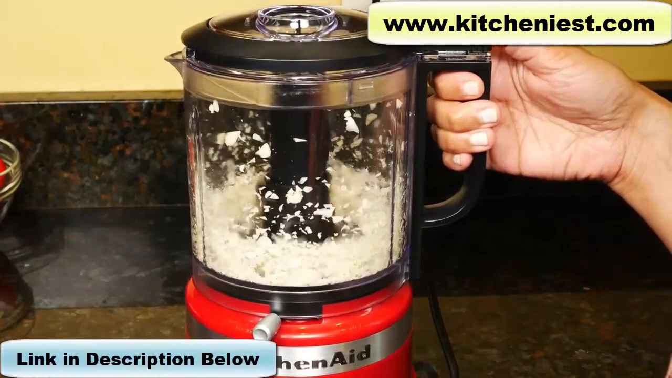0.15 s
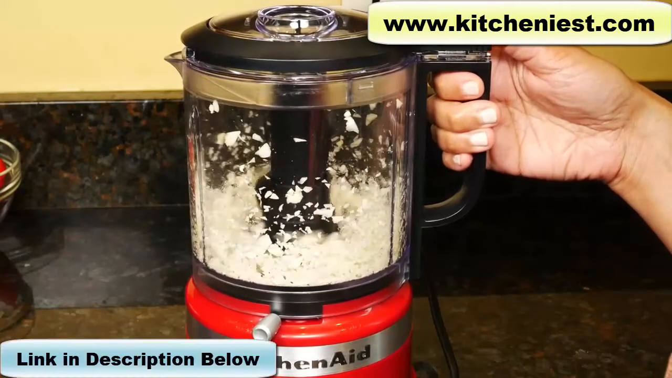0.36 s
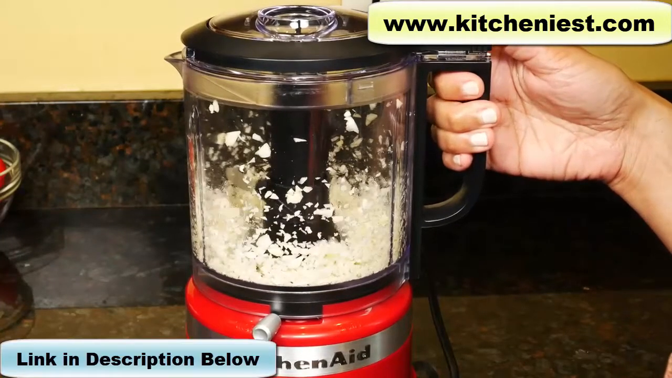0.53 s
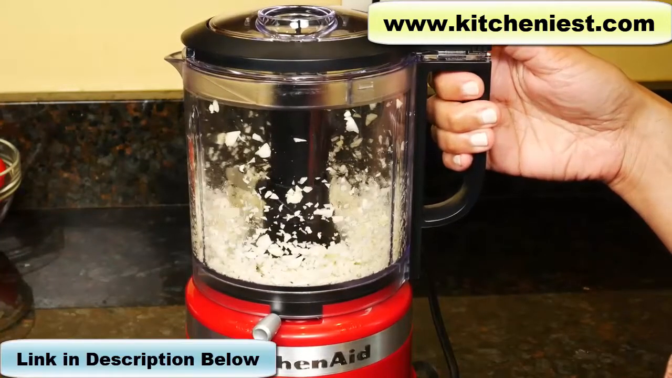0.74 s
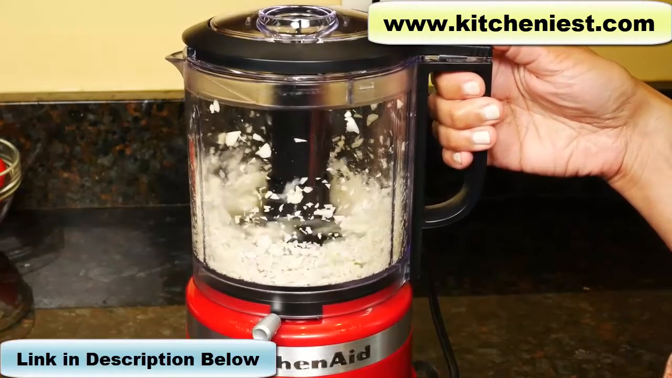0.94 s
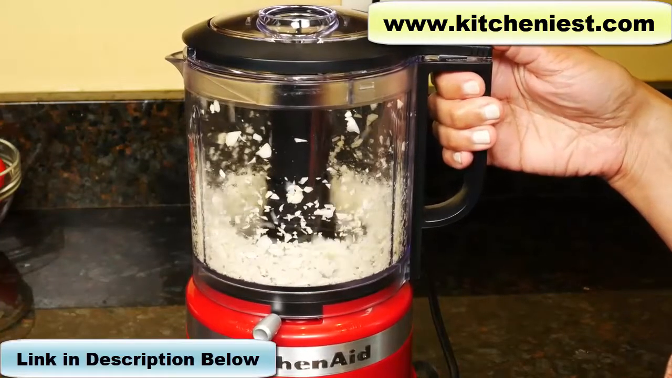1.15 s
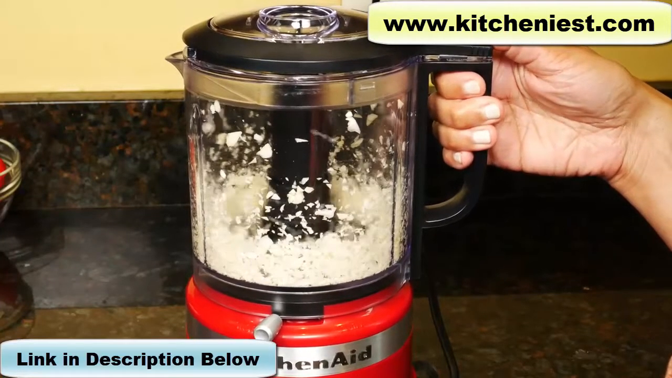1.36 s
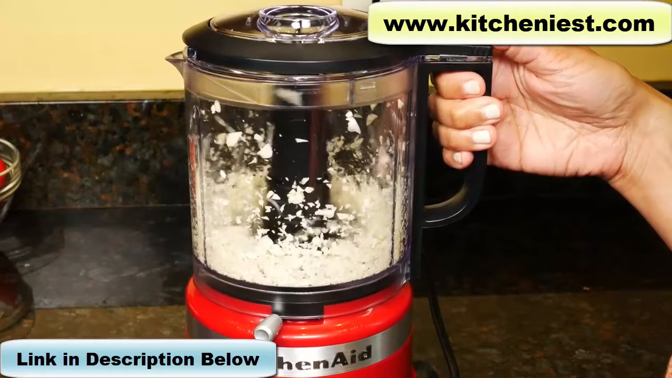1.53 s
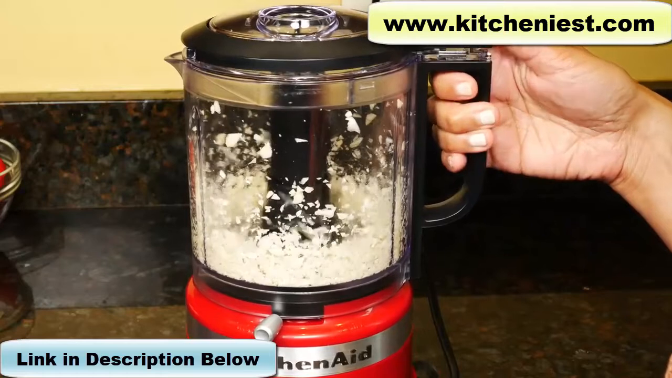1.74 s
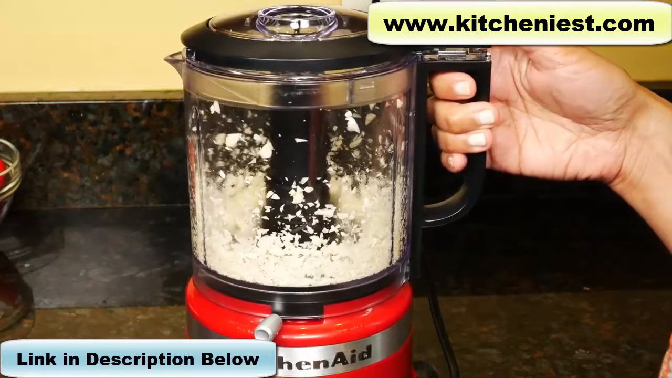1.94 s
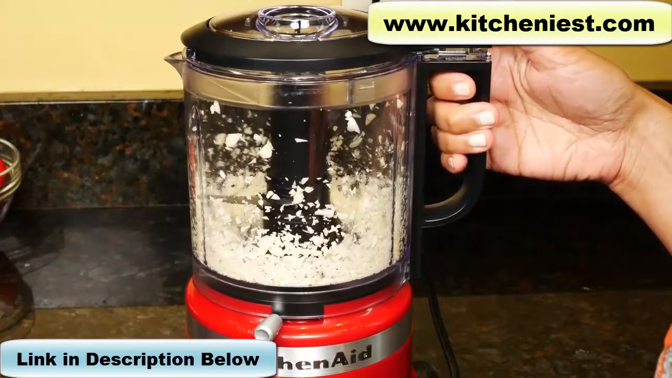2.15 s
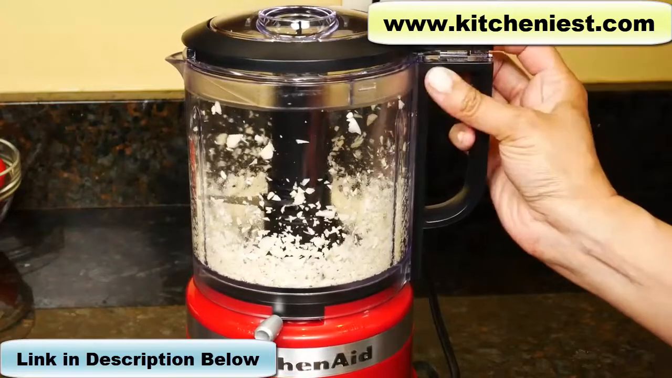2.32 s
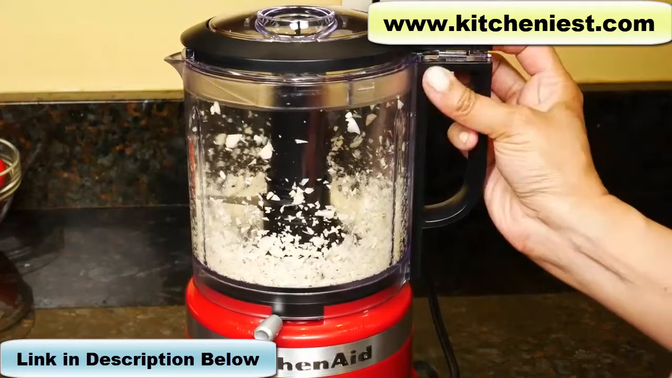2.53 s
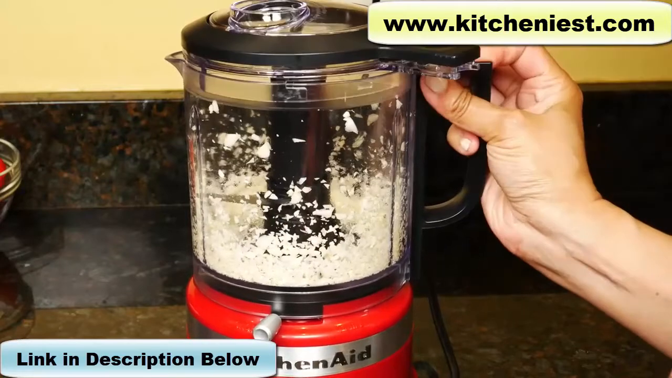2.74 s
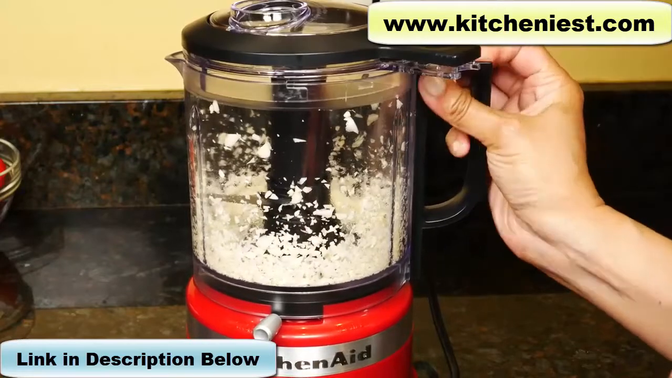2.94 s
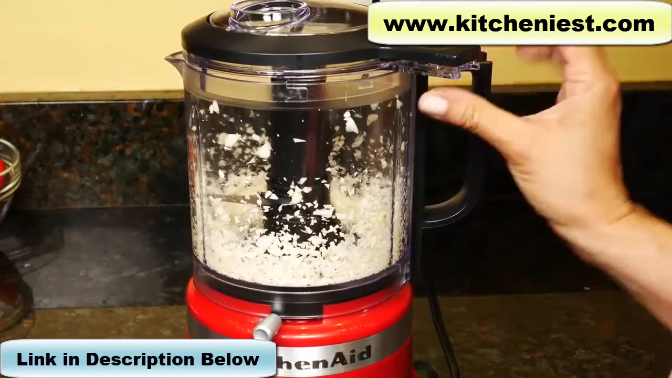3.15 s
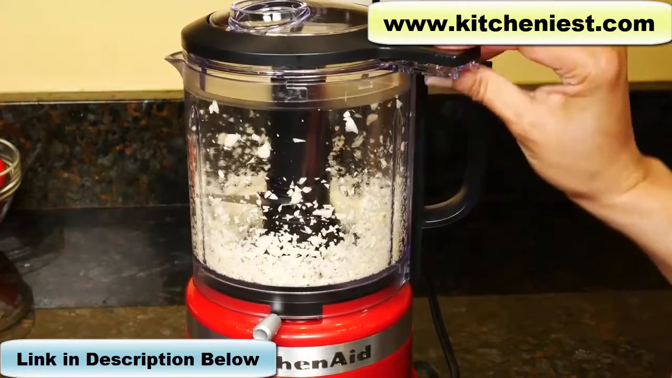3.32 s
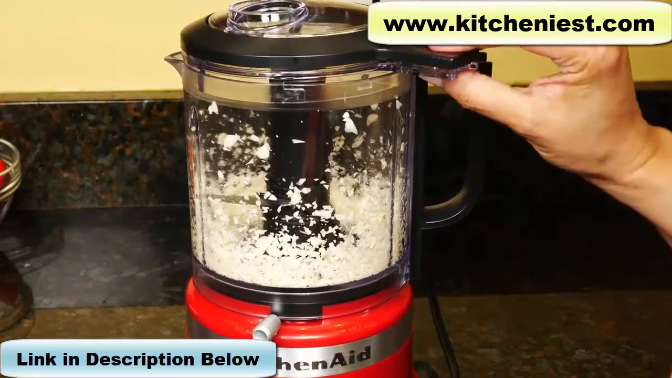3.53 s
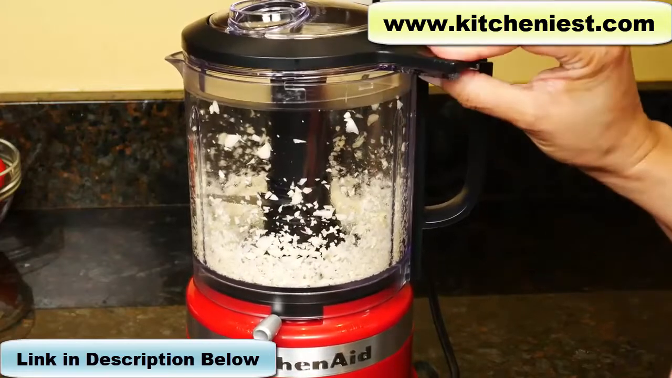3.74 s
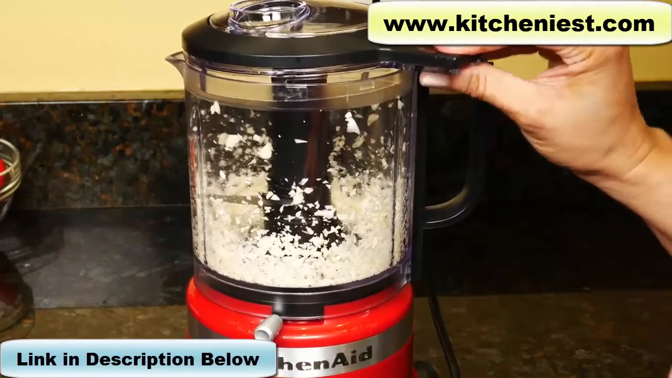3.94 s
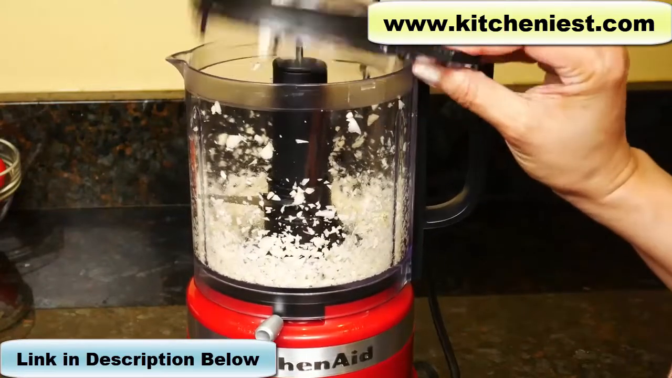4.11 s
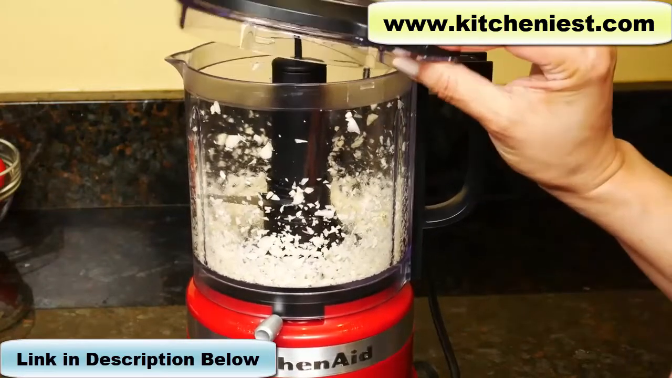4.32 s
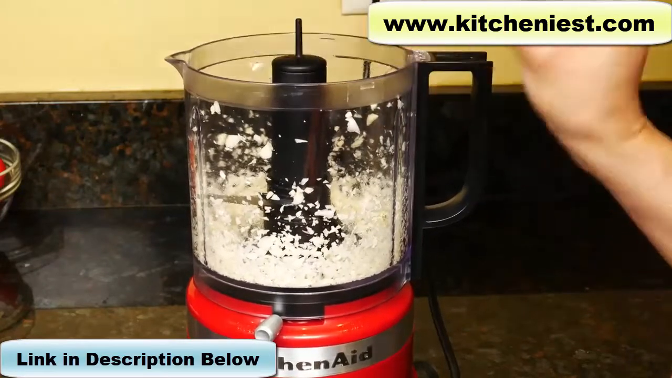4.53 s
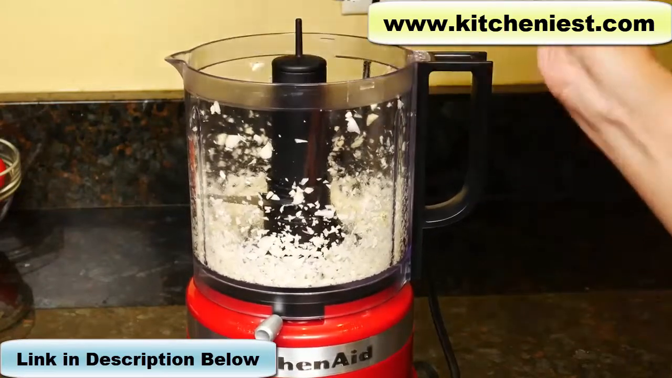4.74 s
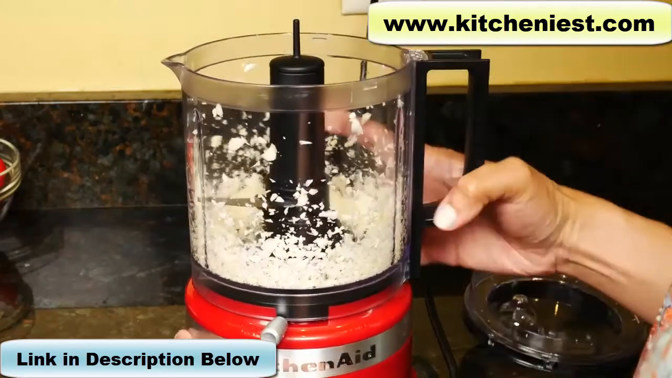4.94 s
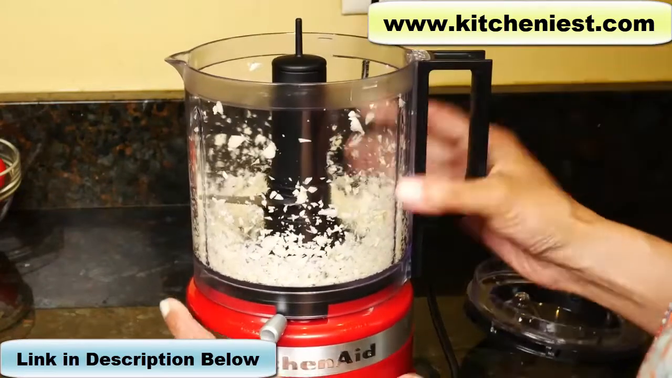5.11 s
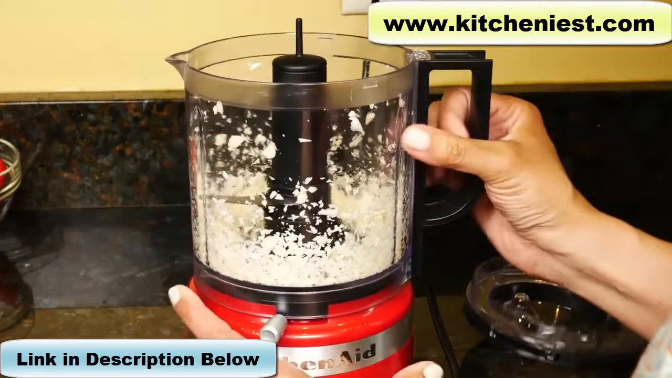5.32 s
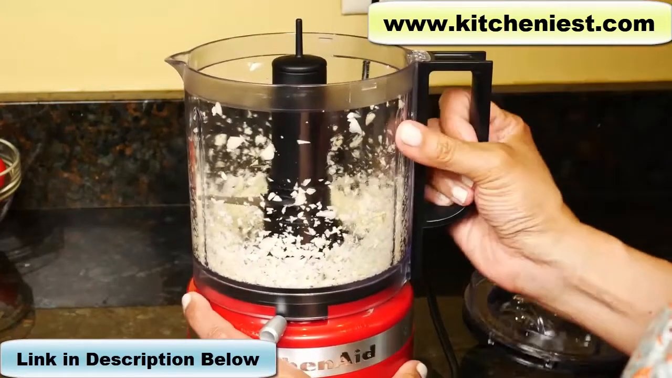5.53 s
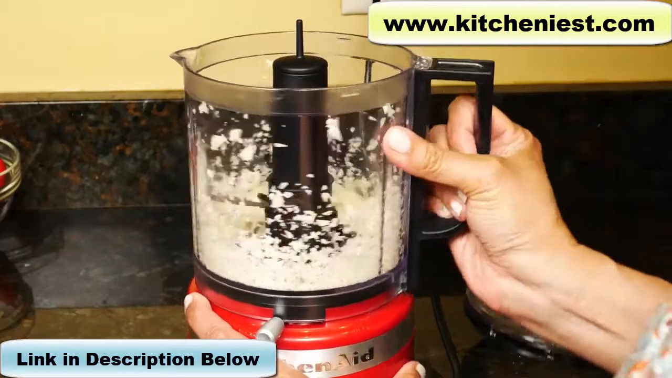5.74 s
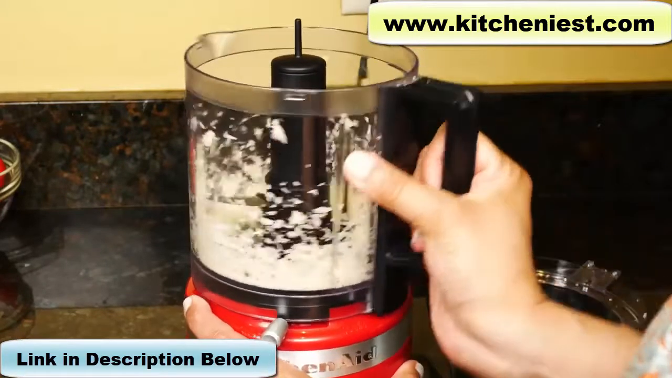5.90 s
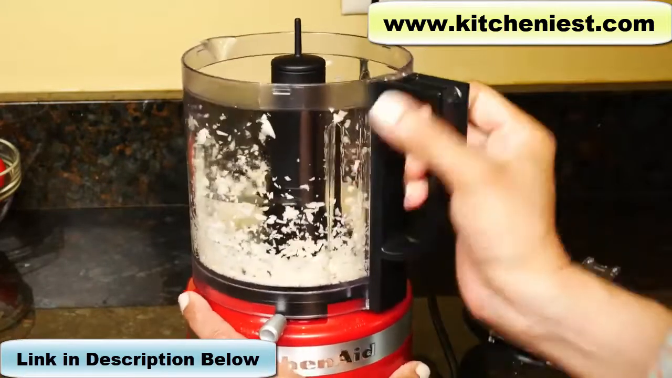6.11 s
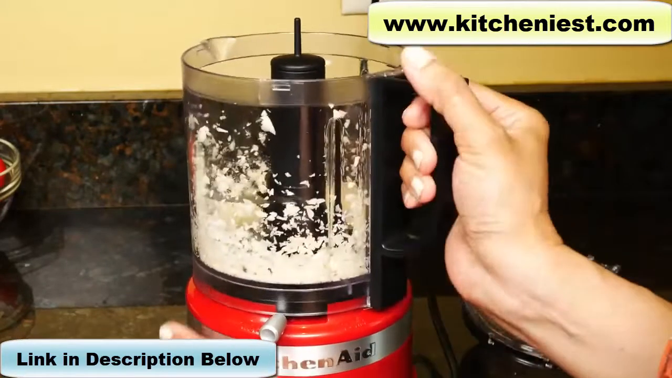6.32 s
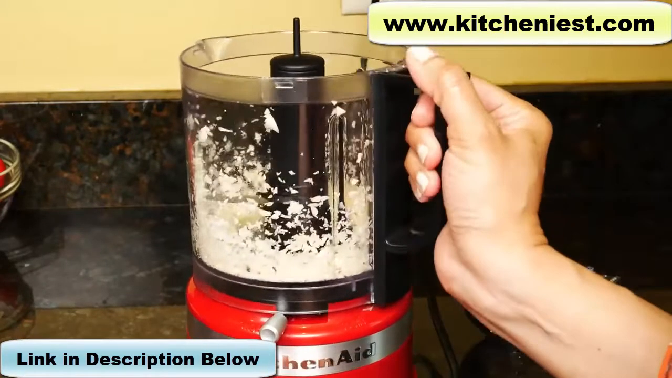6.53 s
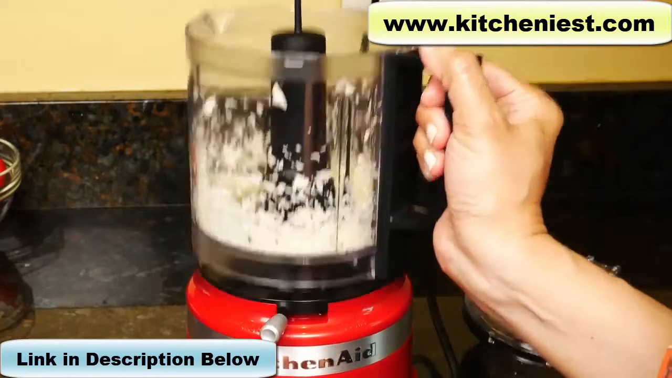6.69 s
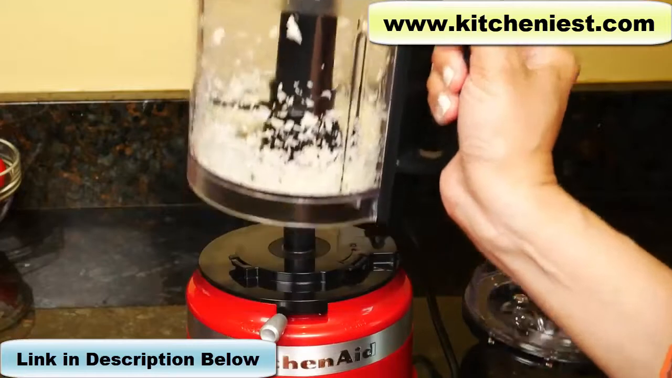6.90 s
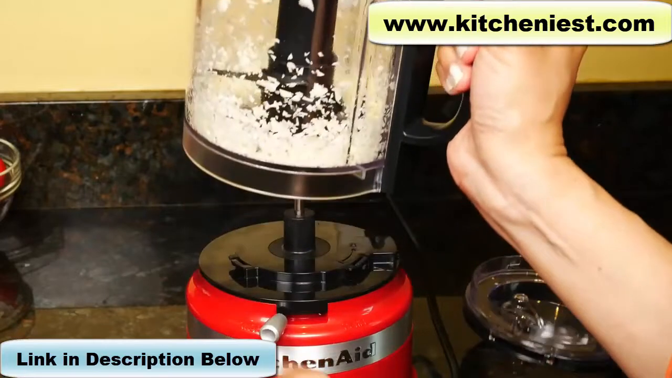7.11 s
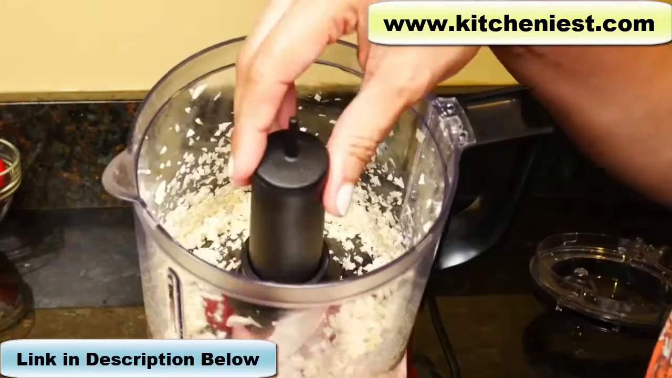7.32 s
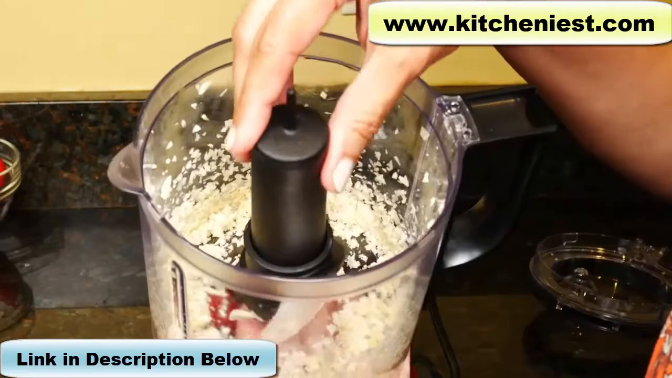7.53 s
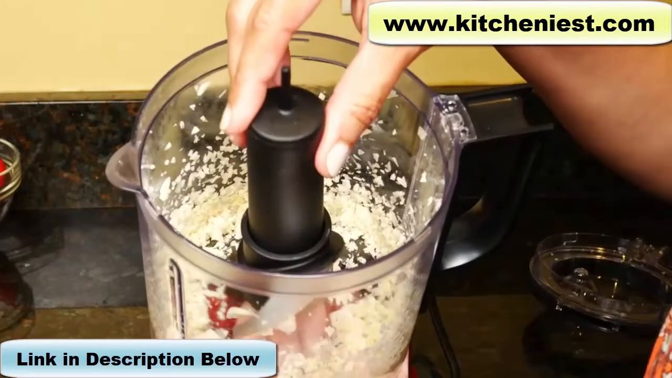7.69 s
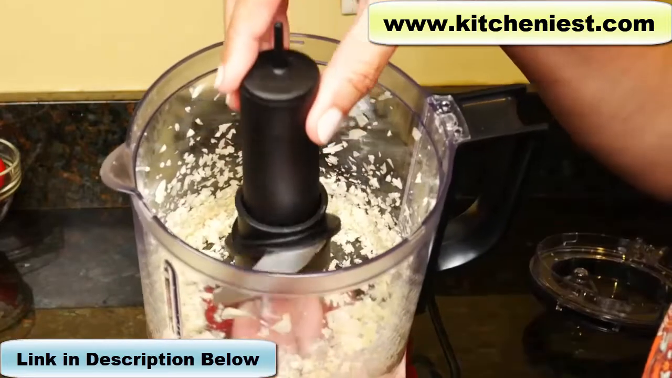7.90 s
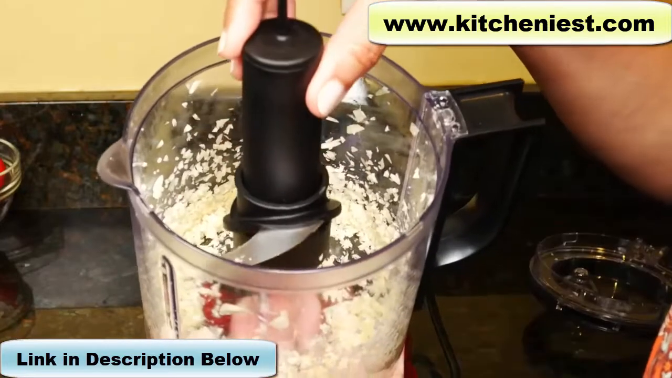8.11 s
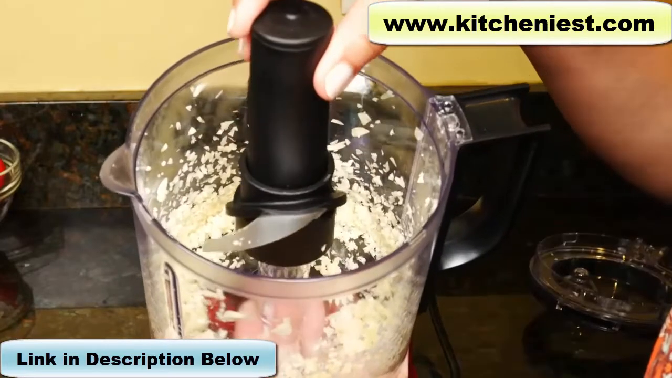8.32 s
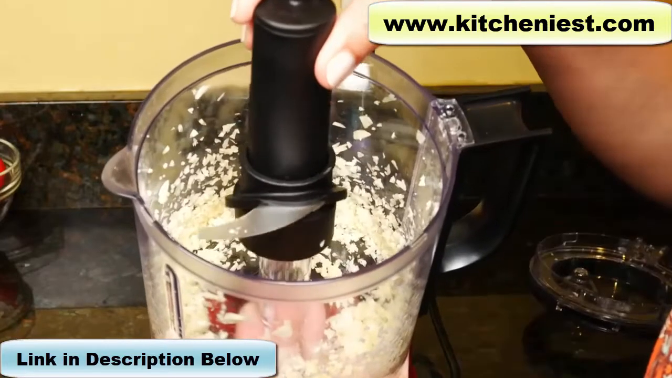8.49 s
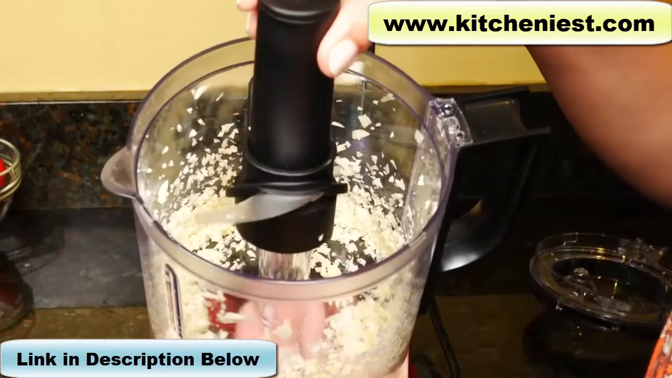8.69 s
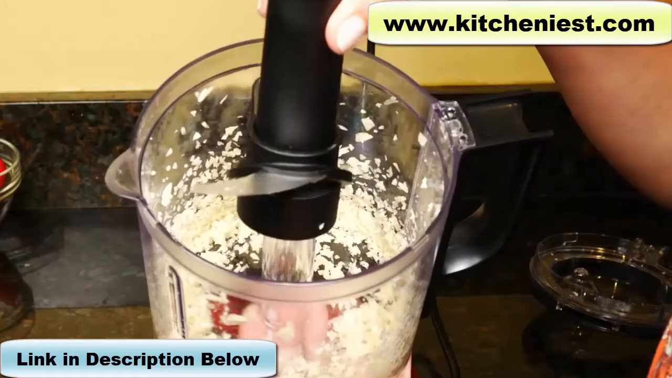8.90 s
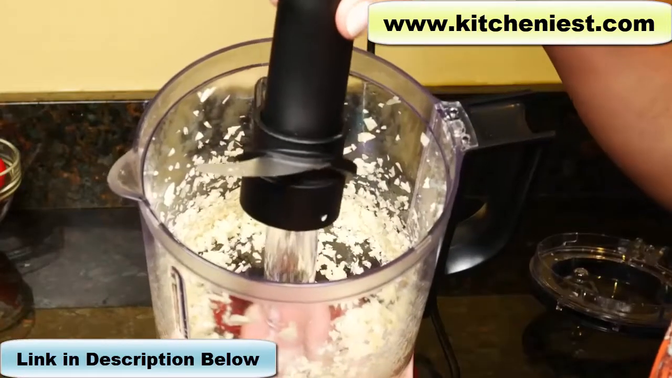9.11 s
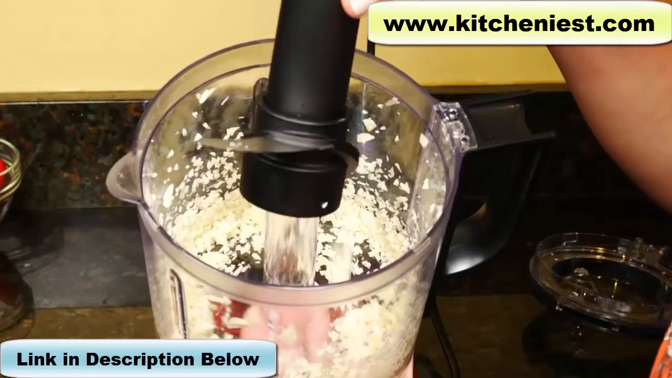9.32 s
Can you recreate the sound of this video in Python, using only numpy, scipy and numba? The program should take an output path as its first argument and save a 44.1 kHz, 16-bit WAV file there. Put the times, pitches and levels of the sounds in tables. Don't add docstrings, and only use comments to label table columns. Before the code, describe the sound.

A small electric chopper at arm's length in a hard tiled kitchen, nearly mono, with a short bright echo and faint fridge hum. It starts already running down, its toothy whine falling and rattling out before 0.8 s. A button click at 0.87 s starts one more pulse, gritty with tumbling food, rising quickly; released at 1.6 s, it glides down to a stop around 2.3 s. A plastic snap comes at 2.6 s, then faint touches, small clicks near 3.8 s and a sharp lid pop at 4.1 s. At 4.9 s the lid lands and the background hum steps up. The bowl twists at 5.2 s, knocks hard at 5.8 and 6.05 s, and rattles off its coupling from 6.6 to 6.9 s. From 7.25 s a hollow hub slides up in stuttering low hoots, pops and thin squeaks, strongest around 7.8 s, fading into sparse hoots by 9.3 s.

```python
import sys
import numpy as np
from scipy import signal
from scipy.fft import rfft, irfft
from scipy.io import wavfile
from scipy.ndimage import uniform_filter1d
from numba import njit

SR = 44100
rng = np.random.default_rng(int(sys.argv[2]) if len(sys.argv) > 2 else 0)


def generate_wav(sig):
    pcm = np.round(np.clip(np.atleast_2d(sig).T, -1, 1) * 32767).astype(np.int16)
    wavfile.write(sys.argv[1], SR, pcm)


def volts(x):
    e = np.asarray(x, float) / 20
    return 10 ** e


N = 412330
T = np.arange(N) / SR
TOP_SPEED_HZ, STEADY_HZ = 2654, 2200
TUMBLE_DB, TUMBLE_HZ = 2.5, 40


def unit(x):
    return x / np.sqrt(np.mean(np.abs(x) ** 2))


def noise():
    return rng.standard_normal(N)


def columns(spans):
    rows = np.concatenate([np.array(s, float) for s in spans])
    on = sum((T >= s[0][0]) & (T <= s[-1][0]) for s in spans)
    return uniform_filter1d(1. * on, size=128), [np.interp(T, rows[:, 0], c) for c in rows.T[1:]]


def shape_by(x, table):
    hz, db = np.transpose(table)
    f = np.arange(N // 2 + 1) * SR / N + 1
    return irfft(rfft(x) * volts(np.interp(np.log(f), np.log(hz), db)), N)


def colour(x, table):
    return unit(shape_by(x, table))


def band(x, lo_hz, hi_hz):
    return signal.sosfilt(signal.butter(2, [lo_hz, hi_hz], "bandpass", fs=SR, output="sos"), x)


def walk(hz):
    k = max(int(SR / hz), 1)
    return unit(uniform_filter1d(uniform_filter1d(noise(), k), k))


def grit(db):
    size = rng.exponential(size=N // 16 + 1).clip(0, 4)
    return noise() * volts(db * size.repeat(16)[:N])


@njit
def svf(x, hz, width):
    y, b, l = np.empty(len(x)), 0., 0.
    for i in range(len(x)):
        g, k = np.tan(np.pi * hz[i] / SR), width[i] / hz[i]
        v = (b + g * (x[i] - l)) / (1 + g * (g + k))
        b, l, y[i] = 2 * v - b, l + 2 * g * v, k * v
    return y


def peak(x, hz, width_hz):
    return svf(x, hz + 0 * T, width_hz + 0 * T)


def add(out, s, x):
    i = int(s * SR)
    out[i:i + len(x)] += x[:N - i]


def decay(t, t60):
    return np.exp(-np.log(1000) * t / max(t60, 1e-3))


def kitchen():
    # frequency in Hz, rms level in dB.
    fridge = [(59.2, -55.5), (242.2, -64.5), (1911, -76.5), (2132, -80), (2309, -76.5), (2369, -75),
              (2428, -72.5), (2487, -79), (3435, -81.5), (4619, -84), (6153, -79.5), (6390, -86),
              (6449, -76), (8995, -92.5)]
    # frequency in Hz, width in Hz, level in dB.
    panels = [(45.6, 8.7, -61.5), (116.3, 9, -66.5), (181, 67, -67.5), (230, 37, -72.5), (1370, 8.8, -73.5),
              (2380, 170, -87.5), (6070, 370, -77), (8700, 640, -79)]
    # frequency in Hz, density in dB per Hz.
    room_air = [(12, -35.5), (20, 0), (58, -3), (182, -23.5), (241, -2.5), (542, -5), (1570, -20.5),
                (2460, -24.5), (2670, -29.5), (3840, -31.5), (6360, -33), (11500, -38.5), (14300, -43.5),
                (16000, -64.5)]
    # middle in seconds, change in dB, half length in seconds.
    ducks = [
        (.5, -5, 0.43),
        (2.135, -7, .35),
        (5.954, -0.5, 0.28),
    ]
    hum = 0
    for hz, db in fridge:
        line = np.sqrt(2) * np.sin(2 * np.pi * (hz * T + rng.random()))
        hum = hum + volts(db + 1.2 * walk(2.7)) * line
    buzz = sum(volts(db) * unit(peak(peak(noise(), hz, w), hz, w)) for hz, w, db in panels)
    gain_db = np.where(T < 4.909, -14.5, 1)
    for s, db, half in ducks:
        gain_db = gain_db + db * np.clip(1 - np.abs(T - s) / half, 0, 1)
    return (hum + buzz + colour(noise(), room_air) * volts(-53.5)) * volts(gain_db)


def room(x):
    t60, damp_hz = 0.41, 6480
    t = T[:SR // 2]
    hiss = rng.standard_normal(len(t))
    dull = band(hiss, 120, damp_hz)
    tail = (dull + (hiss - dull) * decay(t, t60)) * decay(t, t60) * (t > .004)
    return signal.fftconvolve(x, tail / np.sqrt(np.sum(tail ** 2)))[:N]


def ticks():
    # start in seconds, peak in dB, frequency in Hz.
    clicks = [(5.2097, -21, 5800), (5.7748, -10.5, 1600), (6.7535, -25, 920), (6.632, -26, 1450),
              (5.829, -15, 930), (6.8055, -33, 800), (4.9612, -25, 3500), (2.59, -24, 1130),
              (2.608, -23, 1460), (2.617, -24, 3000), (2.304, -38, 1500)]
    cycles = 1.1
    out, t = np.zeros(N), T[:SR // 100]
    for s, db, hz in clicks:
        add(out, s, -volts(db) * 1.38 * np.sin(2 * np.pi * hz * t) * np.exp(-t * hz / cycles))
    return out


def tints():
    # start in seconds, frequency in Hz, peak
    # in dB, t60 in seconds.
    parts = [(.859, 5200, -46, .03), (.859, 8200, -46, .03), (2.293, 3140, -47, 0.19),
             (2.303, 1620, -44, .12), (2.59, 1750, -32, 0.078), (2.615, 2930, -39, 0.092),
             (2.615, 4240, -31, 0.049), (3.725, 3260, -56, .05), (3.85, 4600, -44.5, 0.073),
             (3.85, 6000, -45, 0.093), (3.852, 7300, -50, 0.11), (4.098, 8000, -28.5, 0.025),
             (4.1, 5000, -36, 0.071), (4.1, 3100, -32, 0.076), (4.1, 4240, -29.5, 0.075),
             (4.961, 3700, -29.5, 0.042), (5.003, 8700, -40, 0.19), (5.209, 4100, -28, 0.079),
             (5.209, 6900, -34, 0.064), (5.771, 5280, -15, 0.03), (5.771, 7100, -21.5, 0.043),
             (5.8, 5530, -31, 0.13), (5.829, 774, -20, 0.011), (5.83, 1620, -27, 0.024),
             (6.044, 1520, -17.5, 0.016), (6.049, 8500, -26, 0.027), (6.049, 5900, -29, 0.058),
             (6.186, 5100, -44, 0.037), (6.632, 1330, -26.5, 0.032), (6.667, 5500, -31, .03),
             (6.668, 4620, -33, 0.058), (6.675, 2290, -32, 0.07), (6.753, 814, -25, 0.036),
             (6.755, 2220, -45, .12), (6.832, 2210, -46, .08), (7.247, 1000, -38.5, 0.014),
             (7.249, 4300, -48, 0.023), (7.982, 2170, -41.5, .03), (8.262, 2180, -38, 0.046),
             (5.7745, 2690, -18, .012), (5.805, 1750, -24, 0.038), (6.645, 1150, -45, 0.09),
             (6.7, 1880, -45, 0.14), (6.765, 1590, -52, 0.066), (6.806, 3400, -48, .04),
             (6.835, 1390, -39, 0.046), (.875, 1440, -29.5, 0.25), (.872, 584, -36, .06),
             (.905, 2850, -24, 0.096), (2.318, 5500, -55, .03), (4.068, 8800, -50, 0.042),
             (5.772, 1380, -17.5, 0.05), (6.3, 2600, -47.5, .05), (6.186, 2830, -33, 0.022),
            (5.6, 1700, -38, .03), (2.592, 201, -37.5, 0.045), (4.105, 1404, -34.5, .06),
            (4.105, 2160, -38, .05), (2, 890, -43, .05), (6.832, 2200, -41, 0.046), (6.813, 2400, -44, .03),
            (6.918, 2200, -53, .03), (5.3, 1600, -45, .06), (5.3, 3000, -47, 0.092),
            (5.34, 2930, -48, 0.084), (6.625, 2700, -43, .02), (5.909, 2450, -37, .015),
            (6.627, 1350, -28, .04), (5.765, 3200, -27, .02), (5.749, 2950, -31, 0.062),
            (5.749, 1600, -27, .05), (5.53, 2740, -48, .02)]
    spread = 0.07
    out, t = np.zeros(N), T[:SR // 5]
    for s, hz, db, t60 in parts:
        shake = rng.standard_normal(len(t))
        ring = band(shake * decay(t, t60), hz * (1 - spread), hz * (1 + spread))
        add(out, s, volts(db) * ring / np.abs(ring).max())
    return out


def slides():
    # start in seconds, length in seconds, hiss in dB, pressure in dB, swell over the stroke in dB.
    strokes = [
        (2.948, 0.13, -76.5, 0, -4),
        (3.203, 0.67, -86.5, -0.5, 3),
        (4.898, 0.23, -58.5, -9, 11.5),
        (5.19, 0.36, -47.5, -11, -12.5),
        (5.512, 0.32, -66, -1, 20),
        (5.77, 0.2, -52.5, 0, -6.5),
        (6.001, 0.56, -51, -26, -18),
        (6.558, 0.41, -54.5, 5.5, -14.5),
        (6.95, 0.51, -65.5, 0, -1.5),
    ]
    # frequency in Hz, density in dB per Hz.
    skin = [(760, -21), (1300, -32), (1570, 1), (1860, 8), (4040, 10), (4440, 8.5), (4830, 9.5), (10100, 3),
            (14100, -2.5), (16000, 0)]
    flicker_db, flicker_hz = 1.8, 60
    grip_s = 0.034
    hiss = colour(grit(0.7), skin) * volts(flicker_db * walk(flicker_hz))
    rumble = unit(band(grit(4.8), 270, 1300)) * volts(2 * flicker_db * walk(flicker_hz))
    out = 0
    for s, length, db, press_db, swell_db in strokes:
        held = np.clip(np.minimum(T - s, s + length - T) / grip_s, 0, 1)
        stroke = held * volts(db + swell_db * np.clip((T - s) / length, 0, 1))
        out = out + stroke * (hiss + volts(press_db) * rumble)
    return out


def blows(events, rise_s, crack_db):
    # frequency in Hz, level in dB (halved in the mix), t60 in seconds (not used
    bowl = [(1359, -11.5, 0.15), (1830, 5, 0.67), (2284, -23, 0.19), (2590, -17, 0.11), (3230, -6, 0.1),
            (3340, -24, 0.2), (4010, -23.5, 0.13), (5000, 25, 0.23), (5360, 31.5, 0.2), (6800, -46, 5.0),
            (7040, -50.5, 0.32), (7700, -30.5, 0.11), (6900, -30, 5.0), (8330, -24, 0.064)]
    ring_t60, mode_t60 = .017, .004
    mode_share, scatter_db = .35, 2.5
    out, t = np.zeros(N), T[:SR // 8]

    def top(x):
        return x / np.abs(signal.hilbert(x)).max()

    for s, db, hz, hard_db, t60 in events:
        mix, blow, hiss = [rng.standard_normal(n) for n in (len(bowl), len(t), len(t))]
        shape = (1 - np.exp(-(t / rise_s) ** 2)) * decay(t, t60)
        modes = 0
        for (f, level_db, _), m in zip(bowl, mix):
            modes = modes + volts(level_db / 2 + scatter_db * m) * np.sin(2 * np.pi * f * (1 + 0.044 * m) * t)
        modes = modes * decay(t, mode_t60)
        ring = np.sin(2 * np.pi * hz * t) * decay(t, ring_t60)
        low = top(signal.fftconvolve(blow * shape, ring)[:len(t)])
        low = low + 0.68 * top(band(hiss * shape, 0.92 * hz, 1596))
        mid = mode_share * top(signal.fftconvolve(blow * shape, modes)[:len(t)])
        mid = mid + top(band(hiss * shape, 1030, 4260))
        crack = volts(crack_db) * top(band(hiss * shape, 4300, 19500))
        add(out, s - rise_s / 2, volts(db) * (low + volts(hard_db) * (mid + crack)))
    return out


def knocks():
    # start in seconds, ring peak in dB, ring in Hz, hardness in dB, t60 in seconds.
    lid_snaps = [(0.799, -40, 470, -31, 0.062), (0.871, -30, 1330, 1.5, 0.017),
                 (2.292, -45.5, 900, 10.5, 0.063), (2.43, -58, 910, -3, .039), (2.458, -55, 895, -11, .053),
                 (2.59, -24.5, 453, 2, 0.14), (2.609, -42, 270, 19.5, .045), (3.556, -61, 732, 7, 0.25),
                 (3.659, -46.5, 440, -8, 0.071), (3.725, -52, 234, -1, .06), (3.853, -50, 695, 8.5, 0.067),
                 (4.059, -28, 428, -9, 0.03), (4.098, -16.5, 416, 1, 0.025)]
    bowl_snaps = [
        (4.961, -25, 466, -0.5, 0.046),
        (5.057, -46, 810, 17, 0.16),
        (5.209, -22.5, 620, 8, 0.067),
        (5.339, -36, 675, 6, 0.065),
        (5.909, -22.5, 325, -10.5, 0.062),
        (6.043, -9.5, 533, -10, 0.11),
        (6.184, -27.5, 714, -1.5, 0.038),
        (6.451, -50.5, 355, 11, 0.051),
        (6.985, -52, 250, 4, 0.055),
    ]
    lifts = [(6.607, -42, 730, -1, 0.04), (6.624, -21.5, 1000, -26, 0.044), (6.631, -27.5, 1410, -16, 0.19),
             (6.666, -12.5, 863, -19, 0.036), (6.675, -43.5, 954, 12, 0.18),
             (6.744, -23.5, 780, -20, 0.064), (6.752, -29, 750, -25, 0.087), (6.779, -31, 970, -18, 0.025),
             (6.805, -30, 900, -8.5, 0.035), (6.831, -22.5, 895, -23, 0.045),
             (6.916, -29.5, 784, -26, 0.02), (6.93, -36, 700, -14, 0.044)]
    slips = [(.859, -75, 900, 27, .06), (1.044, -36, 450, -20, 0.26), (1.304, -32, 490, -15, 0.035),
             (2.278, -55, 1140, 5, 0.077), (2.302, -41.5, 910, -0.5, 0.11), (2.582, -44, 400, 16, 0.12),
             (2.599, -27.5, 416, 2.5, 0.14), (2.617, -54, 462, 32.5, 0.071), (2.625, -39, 208, 3, 0.41),
             (2.959, -59, 248, 1, .081), (3.27, -55, 500, -9, .083), (3.35, -57, 500, -2, .12),
             (3.832, -49.5, 236, 2, 0.21), (3.87, -39.5, 222, -14, 0.058), (4.042, -47, 300, -3, 0.056),
             (4.068, -43, 400, 9.5, 0.39)]
    thuds = [(5.003, -36.5, 339, -3, 0.068), (5.253, -36, 253, 4, 0.021), (5.301, -45, 1520, 4, .06),
             (5.5, -37, 620, -9, 0.064), (5.53, -27.5, 302, -19, 0.022), (5.747, -21, 730, 1, 0.21),
             (5.766, -12.5, 740, 0.5, 0.035), (5.772, -11, 1370, 0.5, 0.05), (5.804, -20, 740, -5, 0.041),
             (5.822, -21.5, 1270, -3, 0.068), (5.824, -9, 763, -36, 0.0089), (5.849, -44, 720, -17, 0.036),
             (6.034, -19, 520, -30, 0.053), (6.048, -23, 520, 12.5, 0.026), (6.056, -15, 484, -1.5, 0.023),
             (6.077, -38, 553, 13, 0.053), (6.108, -21.5, 494, -27, 0.034), (6.138, -30, 566, -2, 0.037),
             (6.27, -38, 334, -16, 0.054), (6.329, -33.5, 340, -16, 0.048),
             (7.008, -44.5, 540, -1.5, 0.047), (7.979, -35, 544, -13, 0.029), (8.268, -32, 560, -27, 0.025),
             (1.432, -33.5, 486, -15, 0.043), (1.522, -35, 575, -15, 0.031), (1.072, -33, 448, -19, 0.033)]
    # frequency in Hz, gain in dB.
    plastic = [(100, -7), (200, -3), (9000, -0.5), (10000, -13.5), (13000, -13.5), (15500, -22.5)]
    # frequency in Hz, peak in dB, t60 in seconds.
    rings = [(108.4, -9, 0.023), (61, -43, 0.26), (181, -39.5, 0.13), (424, -34, 0.31), (4520, -33, 0.069),
             (48.3, -44, 0.77), (3220, -41.5, 0.17), (103, -19.5, 0.063), (300, -12.5, 0.069),
             (44.8, -39, 0.86), (44.6, -28.5, 1.0)]
    ring_starts = [2.589, 2.59, 3.865, 4.1, 5.058, 5.1, 5.255, 5.771, 5.772, 5.78, 6.05]
    snap_rise_s, lift_rise_s, knock_rise_s = 0.00022, .0015, .004
    out = blows(lid_snaps, snap_rise_s, crack_db=1.5)
    out = out + blows(bowl_snaps, snap_rise_s, crack_db=2.0)
    out = out + blows(lifts, lift_rise_s, crack_db=2.5)
    out = out + blows(slips, knock_rise_s, crack_db=2.0)
    out = out + blows(thuds, knock_rise_s, crack_db=-3.0)
    out = shape_by(band(out, 210, 18000), plastic)
    t = T[:SR]
    for s, (hz, db, t60) in zip(ring_starts, rings):
        add(out, s, volts(db) * np.sin(2 * np.pi * hz * t) * decay(t, t60) * (1 - np.exp(-t * hz / 2)))
    return out


def trapped_air(slip, air_db, hz):
    # middle in seconds, half length in seconds, level in dB, top in Hz.
    whistles = [
        (7.911, 0.049, -40, 754),
        (8.222, 0.017, -53, 718),
        (8.73, 0.028, -44, 695),
    ]
    width_hz, rest_hz = 85, 651

    def cavity(hz):
        narrow = peak(noise() * slip, hz, width_hz)
        return unit(peak(peak(narrow, hz, 2 * width_hz), hz, 2 * width_hz))

    upper, upper_hz = volts(air_db - 17.5), rest_hz
    for s, half, db, top_hz in whistles:
        arch = np.clip(1 - ((T - s) / (2 * half)) ** 2, 0, 1) ** 2
        upper = upper + arch * volts(db)
        upper_hz = upper_hz + arch * (top_hz - rest_hz)
    lower = volts(np.minimum(air_db - 10.0, -33))
    return cavity(hz) * lower + cavity(upper_hz) * upper


def blade_squeak(slip, air_db):
    # frequency in Hz, width in Hz, level in dB.
    squeaks = [(1000, 400, 12.5), (2104, 114, 11), (4630, 1100, 2.5), (5740, 28, 4), (7300, 200, -4),
               (8970, 350, -7), (3700, 120, -3), (10000, 200, -30), (11500, 300, -27)]
    pulls = [
        7.28,
        7.6,
        8.09,
    ]
    grip_s, free_s = .12, 8.02
    rub = noise() * slip
    since = np.min([np.where(T >= s, T - s, 1) for s in pulls], axis=0)
    glide_hz = 4100 + 990 * np.minimum(since, .4)
    body = sum(volts(db) * unit(peak(rub, f, w)) for f, w, db in squeaks)
    squeak = unit(body + 2.4 * unit(peak(rub, glide_hz, 70)))
    return squeak * volts(air_db - 23 - 8.5 * (T > free_s)) * np.minimum(since / grip_s, 1) ** 2


def hub():
    # time in seconds, drag in dB, cavity in Hz.
    drag = [
        [(7.29, -58, 593), (7.385, -26, 580), (7.47, -23.5, 544), (7.57, -35.5, 587), (7.714, -21.5, 581),
         (7.95, -29.5, 544), (8.082, -47, 523), (8.26, -17, 588), (8.308, -45, 534)],
        [(8.312, -44, 534), (8.52, -48, 554), (8.69, -39, 508), (8.73, -72, 583), (8.796, -33.5, 540),
         (8.864, -64, 500), (9.256, -51, 560), (9.296, -42, 563), (9.34, -63, 556)],
    ]
    # time in seconds, peak in dB, frequency in Hz.
    pops = [(7.249, -14.5, 567), (7.2659, -27, 571), (7.36, -38, 565), (7.411, -30, 529), (7.454, -23, 581),
            (7.484, -22.5, 580), (7.618, -27.5, 608), (7.706, -29, 615), (7.749, -31, 618),
            (7.784, -15.5, 544), (7.801, -12.5, 546), (7.824, -15, 540), (7.847, -13, 538),
            (7.864, -25.5, 520), (8.016, -27.5, 538), (8.057, -36, 586), (8.159, -30, 560),
            (8.221, -46, 543), (8.25, -25, 546), (8.269, -21.5, 549), (8.684, -32.5, 560),
            (9.288, -40, 562), (7.373, -34, 585), (7.391, -37, 560), (7.428, -31, 568), (7.502, -38, 580),
            (7.691, -33, 610), (7.722, -29, 587), (7.735, -25, 590), (7.773, -20, 547), (7.879, -40, 554),
            (7.811, -21, 541), (7.834, -19, 535), (7.872, -28, 788), (7.89, -32, 780), (7.923, -30, 575),
            (7.938, -30, 567), (7.986, -26.5, 555), (8.035, -31, 573), (8.14, -31.5, 562),
            (8.185, -38, 550), (8.208, -32, 614), (8.285, -29.5, 550)]
    pop_s = .009
    on, (air_db, hz) = columns(drag)
    slip = volts(2.5 * walk(60))
    out = on * (trapped_air(slip, air_db, hz) + blade_squeak(slip, air_db))
    t = T[:SR // 20]
    swell = ((t / pop_s) * np.exp(1 - t / pop_s)) ** 4
    for s, db, pop_hz in pops:
        add(out, s - pop_s * .6, volts(db) * np.sin(2 * np.pi * pop_hz * t) * swell)
    return out


def motor_speed():
    # on in seconds, off in seconds, level in dB.
    presses = [
        (-1.0, -0.102, 1),
        (0.869, 1.607, 0),
    ]
    jump_hz, spin_up_s = 1150, .13
    coast_s, friction_hz, stop_hz = .7, 2200, 90
    bite_s, engage_s = 0.18, .03
    hz, on, bite, grip, coast = stop_hz + 0 * T, 0, 0, 0, 0
    for on_s, off_s, db in presses:
        held_s = np.clip(T, on_s, off_s) - on_s
        rise = TOP_SPEED_HZ - (TOP_SPEED_HZ - jump_hz) * np.exp(-held_s / spin_up_s)
        speed = (rise + friction_hz) * np.exp(-np.maximum(T - off_s, 0) / coast_s) - friction_hz
        runs = (T >= on_s) & (speed > stop_hz)
        hz = np.where(runs, speed, hz)
        on = on + volts(db) * uniform_filter1d(1. * runs, size=128)
        bite = bite + runs * np.exp(-np.abs(T - on_s) / bite_s)
        grip = grip + runs * (1 - np.exp(-((T - on_s) / engage_s) ** 2))
        coast = coast + runs * np.clip((T - off_s) / 0.093, 0, 1)
    return hz, on, bite, grip, coast


def gear_whine(hz, turn, blade, coast):
    # multiple of the tooth rate, line in dB, smear in dB, sidebands in dB, blur as a factor.
    teeth = [(1, -7.5, -3, -11, 1), (2, -6.5, -1.5, -14, 0.83), (3, -27, -1.5, -16, 1.3),
             (4, -72.5, -5.5, -49, 1.3), (5, -74, -5.5, -61, 2)]
    pinion, smear_width, slack_hz = 6.7, 0.049, 95
    muffled_hz, radiates_hz = 9100, 1250
    steady = np.minimum(hz / STEADY_HZ, 1)
    kick = np.exp(5 * (np.cos(blade) - 1)) * (1 + 0.36 * walk(40)) * steady

    def wander():
        return unit(0.63 + walk(50) + 1j * walk(50))

    whine = 0
    for k, line_db, smear_db, side_db, blur in teeth:
        rotor = wander() * np.exp(1j * turn / pinion) + wander() * np.exp(-1j * turn / pinion)
        tone = volts(line_db) * wander() + volts(side_db) * rotor
        line = np.sqrt(2) * np.real(tone * np.exp(1j * k * turn)) * steady
        width = 2 * (smear_width * k * hz + slack_hz) * blur
        smear = svf(svf(noise(), k * hz, width), k * hz, width) / np.sqrt(width * np.pi / 2 / SR)
        smear = volts(smear_db) * smear * steady ** max(k - 2, 0)
        smear = smear * volts(-5 * coast * (k == 3))
        muffle = 1 / np.sqrt(1 + (k * hz / muffled_hz) ** 16)
        radiated = np.minimum(k * hz / radiates_hz, 1) ** 2
        whine = whine + (line + smear) * volts(7 * kick / k ** 2) * muffle * radiated
    return unit(whine)


def motor():
    # frequency in Hz, width in Hz, gain in dB.
    housing = [(1410, 87, 8), (1750, 157, 6), (2860, 400, 0), (4530, 230, 0), (5900, 120, 5.5)]
    # frequency in Hz, density in dB per Hz.
    clatter_colour = [(500, -25.5), (900, -37), (1400, -9), (2600, -2), (4100, -8.5), (5200, -4),
                      (6600, -11), (8800, -10), (9800, -20.5), (11500, -26), (13500, -21.5), (14800, -35),
                      (16000, -48)]
    hz, on, bite, grip, coast = motor_speed()
    slow = TOP_SPEED_HZ / hz - 1
    turn = 2 * np.pi * np.cumsum(hz) / SR
    blade = (turn - turn[int(1.3305 * SR)]) / 65.0
    whine = gear_whine(hz, turn, blade, coast) * grip * volts(-46 - 2.0 * slow + 1.5 * bite)
    clatter = colour(grit(2), clatter_colour) * volts(-41.5 - 4 * slow + 6.5 * bite)
    gears = whine + clatter
    gears = gears + sum((volts(db) - 1) * peak(gears, f, w) for f, w, db in housing)
    throb = volts(0.8 * np.cos(blade) + 1.0 * walk(150))
    food_db = -51 - 1 * slow + 15.5 * bite + TUMBLE_DB * walk(TUMBLE_HZ)
    food = unit(band(grit(3.0), 230, 1700)) * volts(food_db)
    rattle_db = -51 - 1.0 * slow + TUMBLE_DB * walk(TUMBLE_HZ)
    rattle = coast * unit(band(grit(2.3), 1150, 1970)) * volts(rattle_db)
    counter = volts(-66.5 - 1.2 * slow) * unit(band(noise(), 75, 150))
    return on * (gears * throb + food + rattle + counter)


def scene():
    # frequency in Hz, level in dB.
    apart = [(30, -39), (60, -40), (125, -30), (300, -33), (600, -45), (1200, -39), (2500, -34),
             (5000, -33), (9000, -30), (14000, -20)]
    near = motor() + knocks() + slides() + hub() + tints() + ticks()
    mid = near + volts(-11.5) * room(near) + kitchen()
    side = volts(7) * shape_by(mid * walk(30), apart)
    return np.array([mid + side, mid - side])


def top_cut(x):
    return signal.sosfilt(signal.butter(12, 16470, fs=SR, output="sos"), x)


def record(dry):
    low_pass = signal.ellip(8, .2, 60, 15300, fs=SR, output="sos")
    mix = signal.sosfilt(low_pass, dry)
    return top_cut(mix)


dry = scene()
out = record(dry)
generate_wav(out)
```